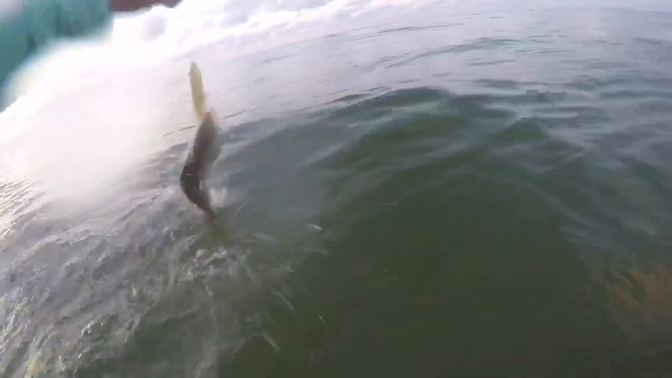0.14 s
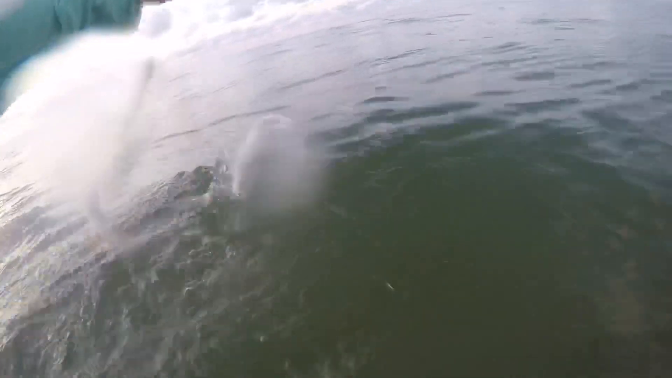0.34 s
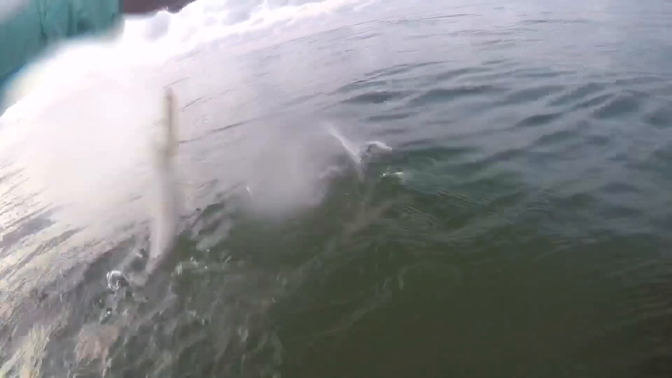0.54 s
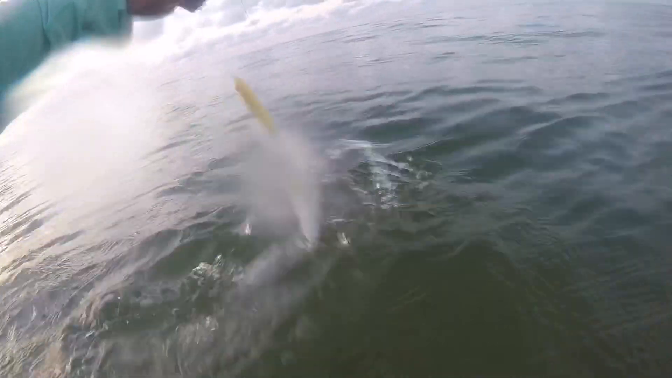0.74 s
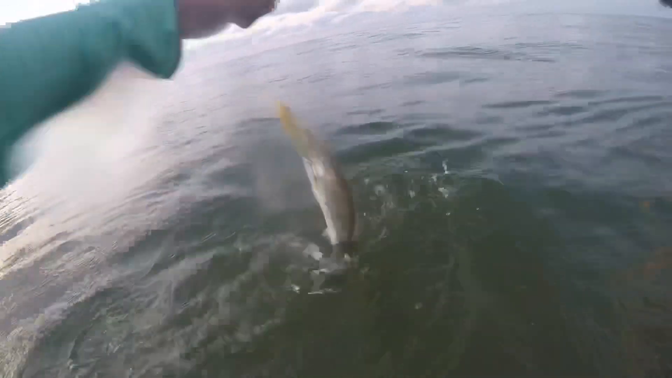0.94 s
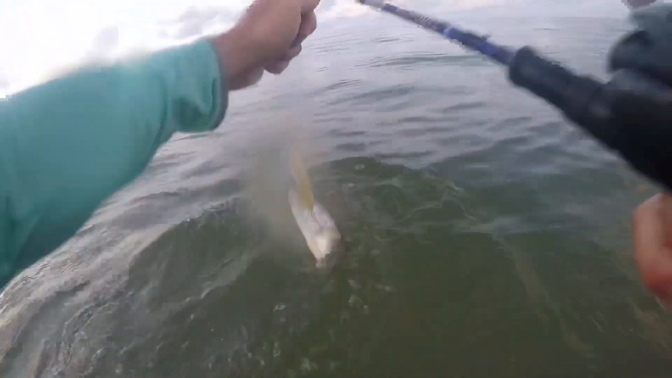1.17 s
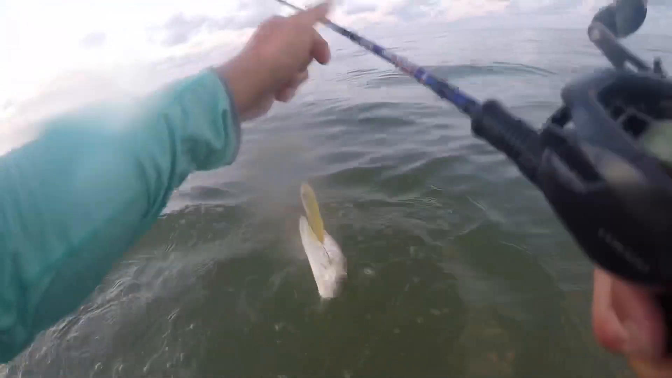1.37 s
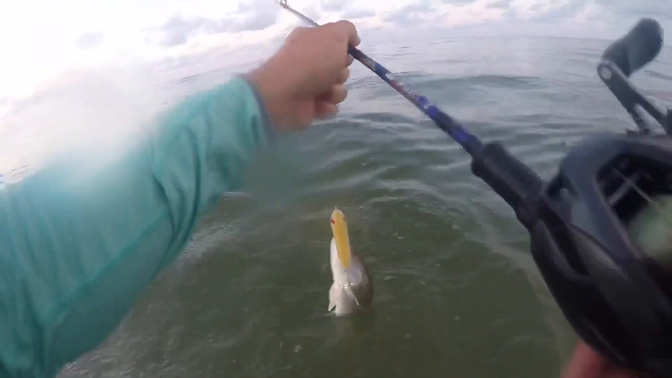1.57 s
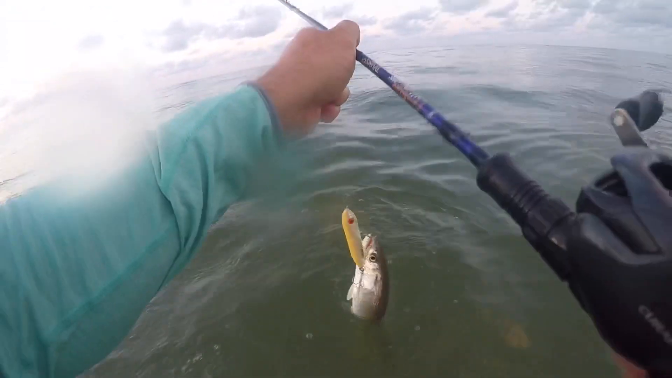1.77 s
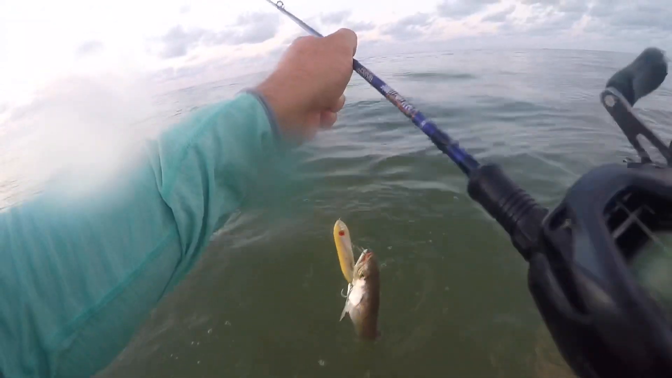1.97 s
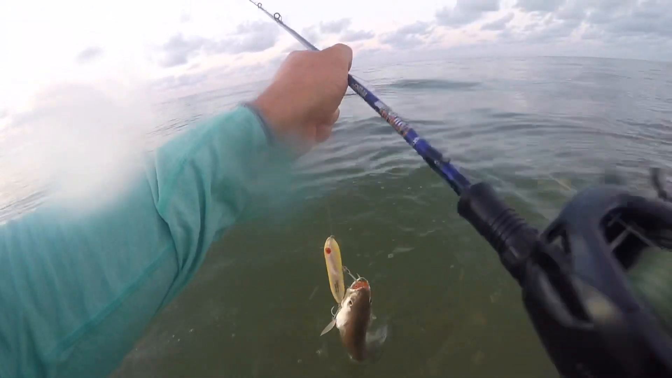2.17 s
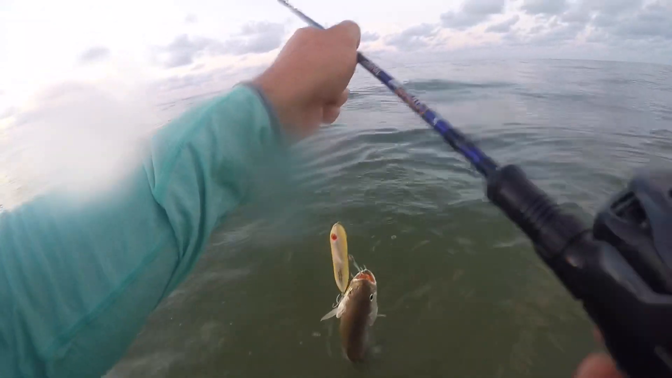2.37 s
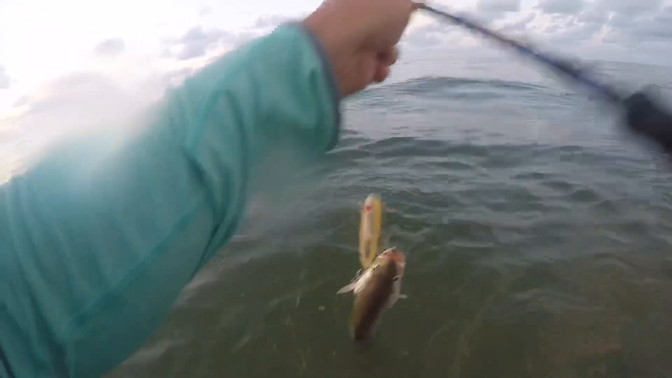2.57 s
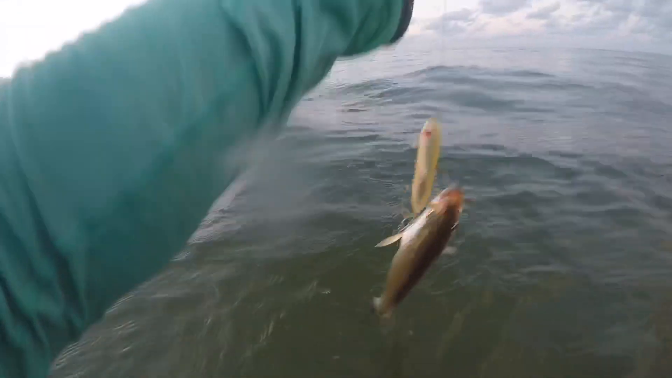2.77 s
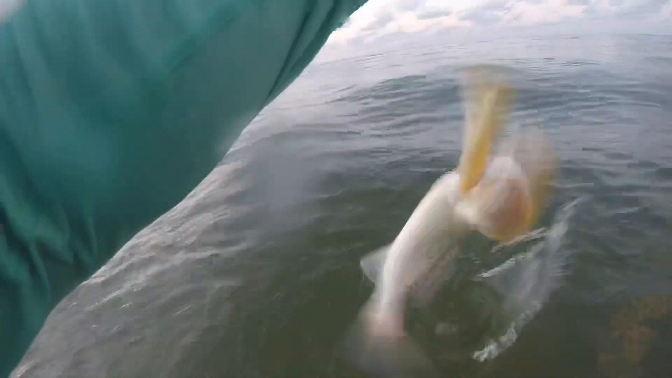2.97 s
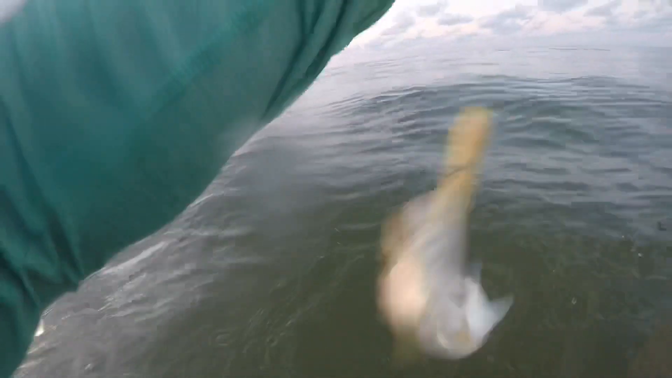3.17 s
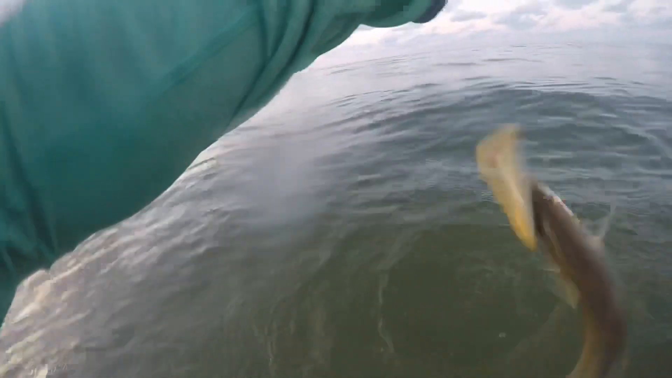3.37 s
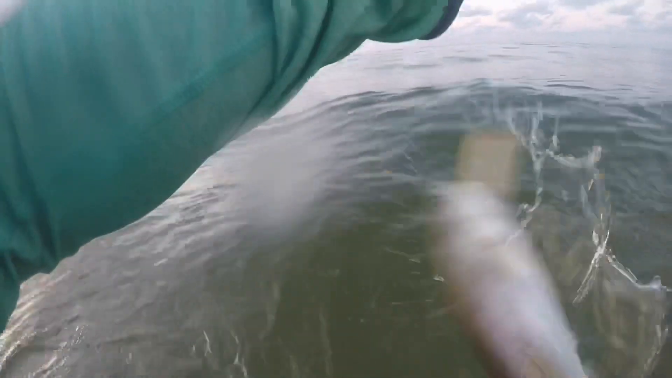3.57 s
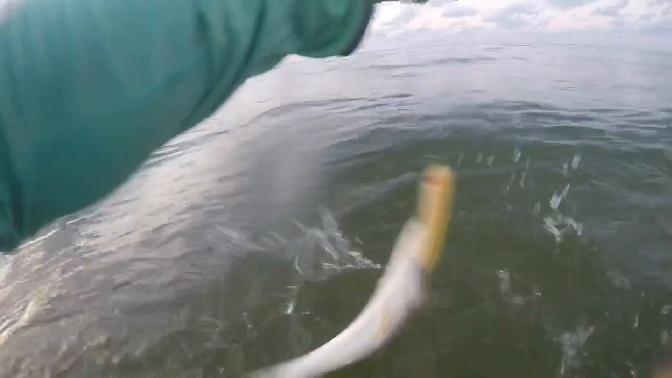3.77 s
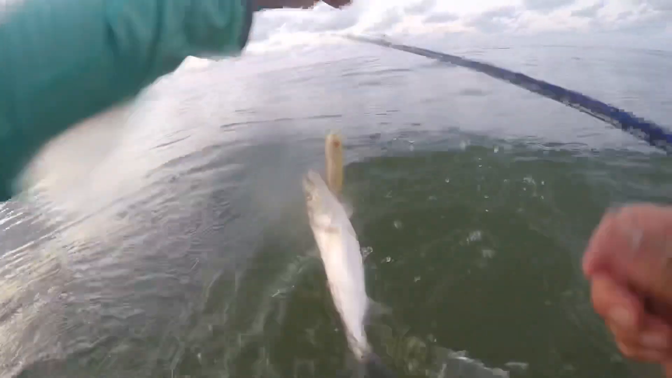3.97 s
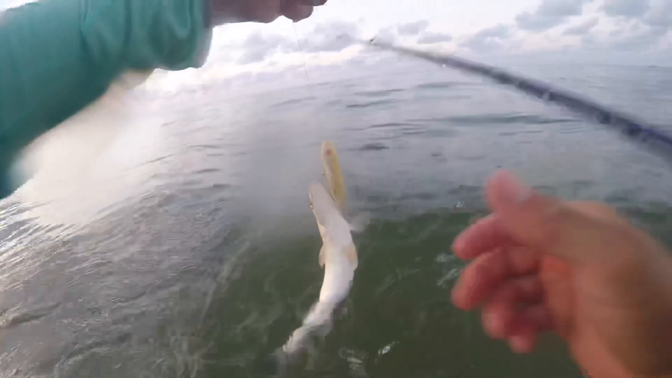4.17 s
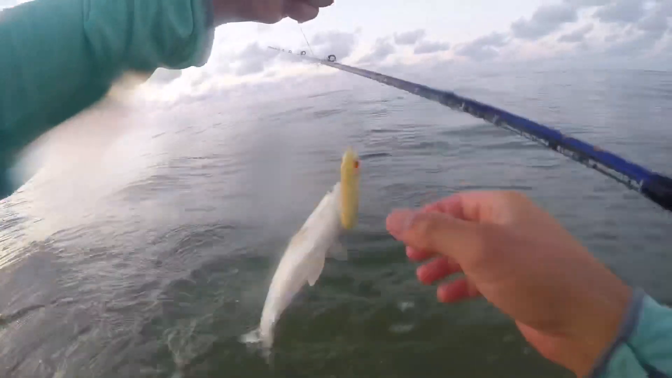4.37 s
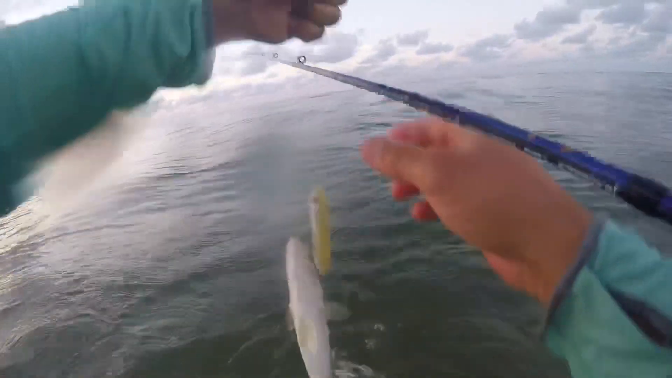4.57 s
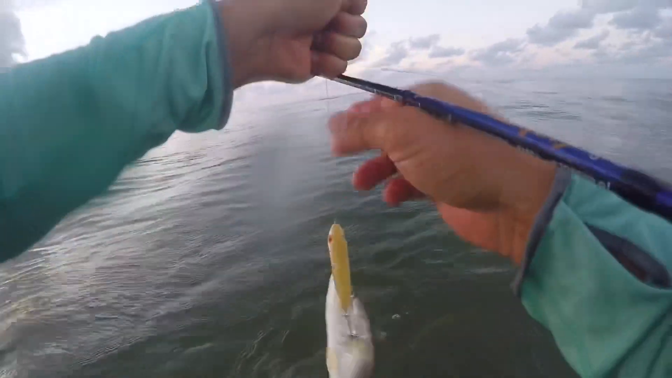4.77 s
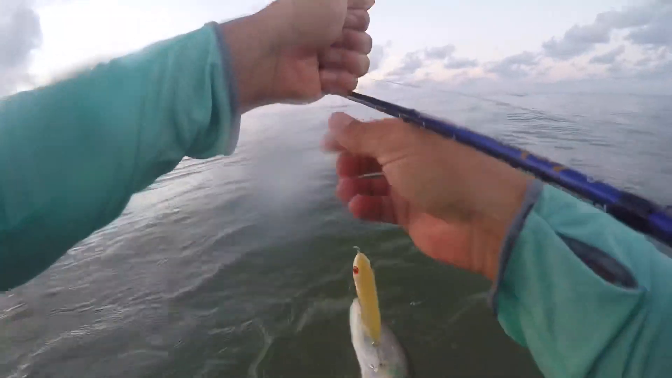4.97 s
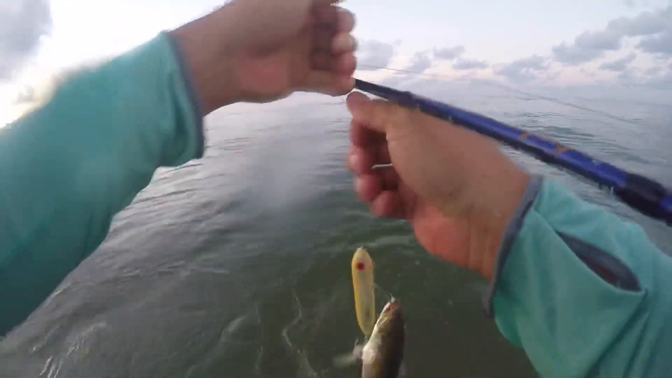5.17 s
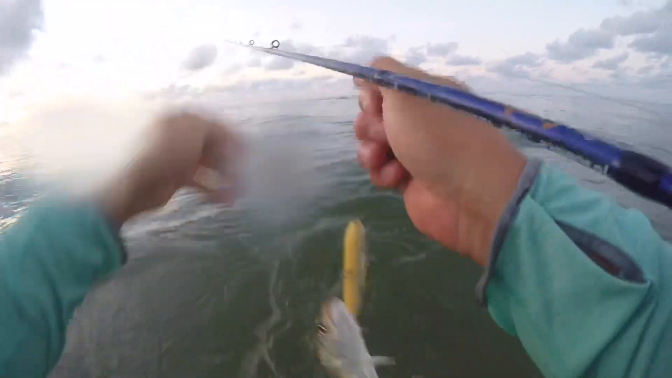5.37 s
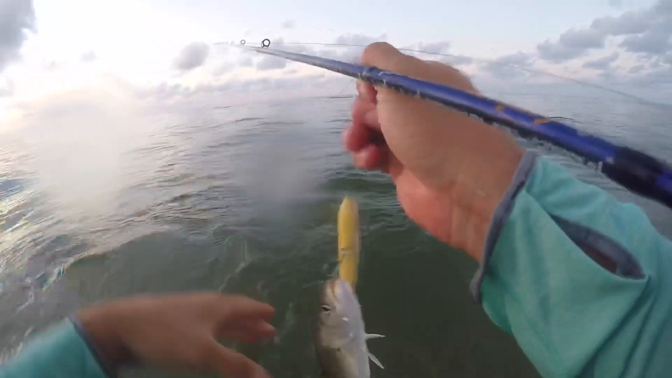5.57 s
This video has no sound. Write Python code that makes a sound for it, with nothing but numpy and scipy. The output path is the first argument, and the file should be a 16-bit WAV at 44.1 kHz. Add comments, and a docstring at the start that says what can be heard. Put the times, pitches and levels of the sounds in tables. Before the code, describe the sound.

A hooked fish thrashes at the sea surface, rattling a hollow hard lure with sharp clicks, splashes and drips over low wind and surf.

```python
"""Low surf, gusty wind and faint hiss, made of filtered noise, lie under a hooked fish at the sea surface.
In the first second it thrashes: its shakes rattle a hollow lure (impacts and shell modes) and throw spray
(trains of ticks and bubbles), with slaps, plops and drips; bumps and sleeve rubs reach a body-worn camera.
Just after 2 s the tackle clacks; near 3 s the strongest thrashing begins, then water trickles near 4 s
with a thin squeak of a few harmonics, and weaker bouts follow up to the end."""
import sys
import numpy as np
from scipy import signal
from scipy.fft import rfft, irfft
from scipy.io import wavfile

SR = 44100
rng = np.random.default_rng(int(sys.argv[2]) if len(sys.argv) > 2 else 0)


def pcm_store(signal):
    """Save signal as 16-bit PCM."""
    levels = np.round(np.clip(np.atleast_2d(signal), -1, 1) * 32767)
    wavfile.write(sys.argv[1], SR, levels.astype(np.int16).T)


N = 248283
FREQUENCIES = np.fft.rfftfreq(N, 1 / SR)
TIME = np.arange(N) / SR
SHORT = TIME[:8192]  # time axis of one brief event

# Every "colour" table is a spectrum. Each row: frequency in Hz, relative level in dB.
# Wind on the microphone. Each row: time in seconds, level in dB.
WIND_LEVEL = [(0, -42.5), (1.65, -42), (2.1, -40.5), (3.3, -34), (4.6, -40), (4.77, -31), (4.92, -40.5),
              (5.63, -40)]
# Colour of the wind rumble. Each row: frequency in Hz, relative level in dB.
WIND_COLOUR = [(8.8, -11), (15, 3.5), (33, 1.5), (97, -14.5), (140, -19), (180, -27.5), (310, -120)]
# Surrounding surf. Each row: time in seconds, level in dB.
SURF_LEVEL = [(0, -51.5), (2.1, -57.5), (3.6, -53.5), (5.63, -52.5)]
# Colour of the surf. Each row: frequency in Hz, relative level in dB.
SURF_COLOUR = [(150, -17.5), (250, -1.5), (400, -4), (600, -2.5), (780, -7), (1080, 0), (1500, -14),
               (2100, -16.5), (3000, -32), (6000, -61)]
# Colour of the steady hiss. Each row: frequency in Hz, relative level in dB.
HISS_COLOUR = [(500, -5.5), (1500, 0.5), (2700, 1), (4700, -3.5), (8000, -10.5), (12000, -12),
               (15500, -13.5)]
HISS_DB = -62.5

# Arm movements that rub a sleeve near the camera. Each row: middle in seconds,
# half length in seconds (to 1/e of the peak), level in dB.
SLEEVE_RUBS = [(.33, 0.1, -50), (1.098, 0.31, -57.5), (3.186, 0.5, -50.5), (4.01, 0.084, -46),
               (4.302, 0.062, -46.5), (4.576, 0.16, -49), (5.42, 0.21, -47.5)]
RUB_REST_DB = -62  # the sleeves between movements
# Colour of the rubbing. Each row: frequency in Hz, relative level in dB.
RUB_COLOUR = [(50, -5), (90, 3), (130, -1), (185, 7), (300, -7), (500, -17), (1000, -27), (3000, -41.5)]
# Soft bumps on the camera. Each row: start in seconds, level in dB.
CAMERA_BUMPS = [(0.269, -26.5), (.306, -21.5), (1.098, -21), (1.14, -22), (1.305, -21.5), (1.644, -24.5),
                (1.681, -27), (3.343, -21.5), (4.643, -25), (4.718, -23), (5.198, -24.5), (5.438, -21.5)]
BUMP_START_HZ, BUMP_DECAY_S = 174.7, 0.0038  # every bump sounds the same dull note of the case

# The tackle snapping tight. Each row: start in seconds, relative level in dB, decay in seconds.
TACKLE_CONTACTS = [(2.112, -37.5, 0.0054), (2.1258, -24, 0.0035), (2.129, -14, 0.0016),
                   (2.1306, -8, 0.00087), (2.1336, -16.5, 0.0011)]
# Colour of the contacts. Each row: frequency in Hz, relative level in dB.
TACKLE_COLOUR = [(150, -6), (400, -34), (650, -15), (850, -25), (1300, -13), (1850, -20), (2250, -17),
                 (2660, -3), (3100, -14.5), (4000, -7), (5900, -12.5), (7400, -26), (10000, -18),
                 (13300, -21), (15500, -26)]
# Ring of the tackle. Each row: frequency in Hz, level in dB, time to fall by 60 dB in seconds.
TACKLE_MODES = [(1840, -25, .028), (1875, -41, .09), (2660, -17, .018), (3860, -44, .055), (5930, -32, .02)]

# The body of the fish slapping the water. Each row: start in seconds, relative level in dB,
# centre frequency in Hz, decay in seconds.
BODY_SLAPS = [(.922, -40, 2000, 0.0045), (.998, -34.5, 1900, 0.0024), (3.497, -29, 1860, 0.02),
              (3.564, -23, 1760, 0.0084), (3.61, -33.5, 1110, .0036)]
# The largest air pockets closing. Each row: start in seconds, level in dB, starting pitch in Hz,
# decay in seconds, glide in octaves per second.
CAVITY_PLOPS = [(.005, -35, 833, 0.013, 16.5), (.292, -38, 1425, .0069, 1), (.292, -34, 587, .0069, -24),
                (.435, -27, 1184, 0.0029, -5), (.436, -22, 400, 0.0026, -4),
                (0.493, -28.5, 437, 0.025, 3.5), (.534, -35.5, 873, 0.012, 19.5),
                (.594, -39.5, 463, 0.025, 51.5), (.727, -40.5, 1460, .0086, -3),
                (.977, -31.5, 1095, 0.0054, 7), (1.001, -24, 1210, 0.0029, -10),
                (1.048, -39.5, 928, .015, -9), (3.567, -21.5, 1320, .0057, -0.5),
                (3.568, -27, 336, .0037, -13), (3.612, -33, 390, 0.0041, -3), (3.797, -31, 1800, 0.0027, 5),
                (3.932, -33, 1350, 0.0025, 6), (4.121, -40, 1870, 0.0073, 6),
                (5.618, -33.5, 1117, 0.016, -12)]
# The loudest drops that plink into the sea. Each row: start in seconds, level in dB, starting pitch in Hz.
FALLING_DROPS = [(0.5819, -23.5, 3720), (0.892, -34.5, 4700), (.912, -39, 2040), (.66, -28.5, 2950),
                 (.868, -40, 3150), (3.309, -18.5, 4520), (3.924, -35, 3900), (4.052, -36, 3740),
                 (4.216, -37.5, 3100)]
DROP_CYCLES = 11.7  # a drop's decay, in cycles of its starting pitch

# Bouts of thrashing. Each row: start in seconds, length in seconds, then relative levels in dB
# of the spray, the churned water and the light knocks.
BOUTS = [(0, 0.23, -53, -56, -32.5), (0.31, 0.34, -48.5, -47.5, -41), (0.763, 0.18, -49.5, -53, -31.5),
         (2.982, 0.3, -45, -53.5, -26), (3.32, 0.25, -47, -52, -26), (3.675, 0.21, -49.5, -60, -28.5),
         (3.925, 0.275, -53.5, -52.5, -41), (4.285, .05, -59, -50.5, -50), (4.55, 0.25, -59.5, -66, -35),
         (5.252, 0.24, -66, -52, -52)]
BOUT_RISE_S, BOUT_FALL_DB_PER_S = 0.034, 83
# Colour of the spray's ticks. Each row: frequency in Hz, relative level in dB.
SPRAY_COLOUR = [(530, -31), (900, 1), (1820, -8), (3030, -3), (5000, -17), (5700, -13.5), (6270, -11.5),
                (11000, -31.5), (13000, -20), (15500, -43)]
# Shakes of the fish, each flicking off a sheet of drops. Each row: start in seconds,
# relative level in dB, length in seconds.
SHAKES = [(.029, -34, .018), (0.059, -46, 0.026), (0.17, -41.5, 0.033), (.204, -36, 0.017),
          (0.343, -35.5, 0.026), (.398, -42.5, 0.012), (0.634, -45, 0.031), (2.97, -43.5, 0.039),
          (3.011, -33, 0.039), (3.09, -36, 0.033), (3.132, -32.5, 0.016), (3.168, -20, 0.0084),
          (3.192, -37.5, 0.04), (3.238, -30, 0.0065), (3.308, -31, 0.011), (3.353, -32.5, 0.046),
          (3.421, -30.5, 0.013), (3.441, -38.5, 0.093), (3.51, -33, 0.037), (3.749, -45, .04),
          (3.821, -51.5, 0.094), (4.552, -45.5, 0.02), (4.573, -39.5, 0.021), (4.595, -48, .038),
          (4.72, -55.5, 0.078)]
# Colour of the flicked drops. Each row: frequency in Hz, relative level in dB.
FLICK_COLOUR = [(500, -21), (1100, -12.5), (2000, -3.5), (3000, 4.5), (4200, -3.5), (5800, -1.5),
                (6600, -8), (7800, -4.5), (9000, -14), (13000, -15.5), (15500, -22)]

# Hard hits of the shaken lure and hooks. Each row: start in seconds, relative level in dB,
# relative treble in dB.
HARD_HITS = [(0.0372, -20.5, -6), (.0545, -17, -34), (0.067, -22, -19), (.172, -21.5, -11), (.185, -18, -7),
             (.2037, -13.5, -11.5), (0.2268, -24, -13), (.2354, -27, -3.5), (0.255, -18.5, -27),
             (0.3418, -16, -24), (0.346, -16.5, -6), (.492, -15, -23.5), (.5806, -12.5, -27),
             (0.619, -12.5, -26), (.6508, -17, -26), (0.7616, -13.5, -20.5), (0.8059, -22.5, -16),
             (0.9183, -17, -35), (1.067, -19.5, -55), (2.9257, -13.5, -42), (2.9326, -11, -33),
             (2.9447, -17, -28), (2.988, -21, -15), (3.0155, -2.5, -39), (3.0233, -16, -7),
             (3.0308, -11.5, -5), (3.041, -11, -11), (3.0816, -11.5, -20), (3.0968, -5, -16),
             (3.1084, -9, -32), (3.1485, -4, -23), (3.1682, -7, -11), (3.184, -13, -13), (3.212, -14, -23),
             (3.2356, 0, -21.5), (3.263, -17.5, -13), (3.3039, -17, -14), (3.311, -21, -13),
             (3.3248, -17, -3), (3.34, -13, -8.5), (3.3463, -13, -5), (3.3598, -11, -17),
             (3.3917, -14.5, -11), (3.4267, -9, -23), (3.4352, -12.5, -16.5), (3.471, -20, -10),
             (3.5042, -6, -17), (3.5198, -4.5, -23), (3.689, -25, -31), (3.7188, -16, -25),
             (3.7315, -14, -34), (3.7968, -20, -23), (3.8754, -4, -25.5), (4.0975, -29, -11),
             (4.4799, -27, -19), (4.5744, -11.5, -21), (4.5919, -16.5, -31), (4.622, -15, -37),
             (4.698, -16.5, -24), (4.7365, -20, -36), (4.754, -19, -34), (4.787, -27.5, -23),
             (5.3397, -26, -26.5), (5.4587, -22, -53), (5.5867, -25, -21), (5.6148, -26, -22)]
KNOCKS_PER_S = 45  # slots for light knocks of the lure while the fish moves
# Colour of the hits. Each row: frequency in Hz, relative level in dB.
LURE_COLOUR = [(350, -13.5), (600, -15), (1100, -3.5), (2000, -8), (3000, 6), (4000, 2.5), (5000, -10.5),
               (5800, -15.5), (6600, -6.5), (7700, -9), (8800, -17), (10300, -14.5), (11500, -22.5),
               (13000, -12.5), (15500, -20.5)]
# Modes of the lure and its hooks. Each row: frequency in Hz, relative level in dB,
# time to fall by 60 dB in seconds.
LURE_MODES = [(2685, -45.5, 0.017), (2947, -35.5, 0.075), (3378, -47.5, 0.096), (4720, -45, 0.017),
              (5730, -27, 0.014), (5900, -32, 0.015), (7703, -64, 0.052), (10700, -52, 0.033)]
RING_HZ, RING_SPREAD = 2996, 0.05  # the shell's main ring, and its share of change from hit to hit

BAND_EDGE_HZ = 15550


def amp(db):
    """Logarithmic level: decibels to gain."""
    return 10 ** (np.asarray(db) / 20)


def unit(x):
    """Power normalisation: scales to rms 1."""
    return x / np.sqrt(np.mean(x ** 2) + 1e-20)


def add(mix, s, sound):
    """Superposition: mixes a sound in at time s."""
    part = mix[max(0, round(s * SR)):][:len(sound)]
    part += sound[:len(part)]


def level(rows):
    """Envelope: gain through (seconds, dB) rows, fading to silence within 30 ms outside them."""
    s, db = np.transpose(rows)
    fade = np.interp(TIME, [s[0] - .03, s[0], s[-1], s[-1] + .03], [0, 1, 1, 0])
    return amp(np.interp(TIME, s, db)) * fade


def swell(middle, half_length):
    """Gaussian envelope: a smooth rise and fall around a moment."""
    return np.exp(-((TIME - middle) / half_length) ** 2)


def colour(x, points):
    """Minimum-phase filtering: a causal filter of the given shape; white noise keeps its power."""
    hz, db = np.transpose(points)
    gain = unit(amp(np.interp(np.log(FREQUENCIES + 1), np.log(hz + 1), db)))
    mirrored = np.r_[gain, gain[(N - 1) // 2:0:-1]]
    log_gain = np.log(np.maximum(mirrored, 1e-5))
    # the Hilbert transform of the log gain gives the phase
    response = np.exp(np.conj(signal.hilbert(log_gain)))[:len(FREQUENCIES)]
    return irfft(rfft(x) * response, N)


def drift(hz):
    """Low-passed noise: a slow random wander of rms 1, up to about hz."""
    spectrum = rfft(rng.standard_normal(N)) * np.exp(-(FREQUENCIES / hz) ** 2)
    return unit(irfft(spectrum, N))


def ring(modes):
    """Modal vibration: dying sines of a struck object."""
    return sum(amp(db - 60 * SHORT / t60) * np.sin(2 * np.pi * hz * SHORT) for hz, db, t60 in modes)


def bubble(hz, decay, glide, rise=0.00011):
    """Damped resonance: a dying oscillation whose pitch glides in octaves per second."""
    pitch = hz * 2 ** np.clip(glide * SHORT, -1.5, 1.5)
    oscillation = np.sin(2 * np.pi * np.cumsum(pitch) / SR)
    return oscillation * np.exp(-SHORT / decay) * (1 - np.exp(-SHORT / rise))


def burst(decay):
    """Broadband impact: a puff of dying noise."""
    return rng.standard_normal(len(SHORT)) * np.exp(-SHORT / max(decay, 1e-4))


def contact(decay):
    """Local contact resonance: a sharp tick of random pitches that ring for a moment; energy 1."""
    t = SHORT[:1024]
    place, phase, size = rng.random((3, 22, 1))
    hz = 1200 + 15000 * place
    partials = size ** 2 * np.cos(2 * np.pi * (hz * t + phase)) * np.exp(-t / decay)
    tick = partials.sum(0)
    return tick / np.linalg.norm(tick)


def shower(per_s, spread_db):
    """Random arrivals: independent impacts of either sign, a few of them large."""
    size = amp(spread_db * np.minimum(rng.exponential(1, N), 4))
    return size * rng.choice([-1, 1], N) * (rng.random(N) < per_s / SR)


def crackle(per_s, spread_db, decay, count=24):
    """Superposed random arrivals: a train of unlike ticks."""
    trains = (signal.oaconvolve(shower(per_s / count, spread_db), contact(decay))[:N] for _ in range(count))
    return sum(trains)


def fizzing(pitches, per_s, cycles, glide):
    """Bubble resonance over many sizes: each pitch sounds per_s times a second and dies in cycles."""
    bubbles = (signal.oaconvolve(shower(per_s, 4.2), bubble(hz, cycles / hz, glide))[:N] for hz in pitches)
    return unit(sum(bubbles))


def thrashing():
    """Shared envelopes of spray, churn and knocks: each bout rises quickly, holds, and decays exponentially."""
    gains = np.zeros((3, N))
    for start, length, *dbs in BOUTS:
        rise = np.clip((TIME - start) / BOUT_RISE_S + 1, 0, 1)  # full at the start time
        fall = amp(-BOUT_FALL_DB_PER_S * np.maximum(TIME - start - length, 0))
        gains = np.maximum(gains, amp(dbs)[:, None] * rise * fall)
    return gains


def sea(gust_db=3.0, lap_db=0.92):
    """Modulated noise: gusty wind rumble and the wash of the surf, over a faint steady hiss."""
    gusts = rng.standard_normal(N) * amp(gust_db * drift(5.6))
    laps = rng.standard_normal(N) * amp(lap_db * drift(11.6))
    wind = level(WIND_LEVEL) * unit(colour(gusts, WIND_COLOUR))
    surf = level(SURF_LEVEL) * unit(colour(laps, SURF_COLOUR))
    hiss = amp(HISS_DB) * unit(colour(rng.standard_normal(N), HISS_COLOUR))
    return wind + surf + hiss


def handling(lump_db=3):
    """Structure-borne sound: lumpy sleeve rubbing and bumps reach the microphone through its case."""
    rubbing = amp(RUB_REST_DB) + sum(amp(db) * swell(s, half_length) for s, half_length, db in SLEEVE_RUBS)
    lumpy_noise = rng.standard_normal(N) * amp(lump_db * drift(11.5))
    out = rubbing * unit(colour(lumpy_noise, RUB_COLOUR))
    for s, db in CAMERA_BUMPS:
        add(out, s, amp(db) * bubble(BUMP_START_HZ, BUMP_DECAY_S, -34.0, rise=0.0012))
    return out


def squeak(s=4.16, length=0.08, hz=692, db=-50, fall_db=5):
    """Harmonic series without its lowest members: a faint thin squeak, unsteady and slightly rising."""
    t = np.arange(0, length, 1 / SR)
    pitch = hz * (1 + 0.21 * (t - length / 2) + 0.007 * drift(250)[:len(t)])
    turns = np.cumsum(pitch) / SR
    tone = sum(amp(-fall_db * (k - 3.5)) * np.sin(2 * np.pi * k * turns) for k in range(3, 9))
    out = np.zeros(N)
    add(out, s, amp(db) * tone * signal.windows.tukey(len(t), .6))
    return out


def tackle(ring_s=2.1305, thud_s=2.139, thud_db=-24, thud_hz=95, thud_decay=0.016):
    """Impact excitation: tight hard contacts, then a brief modal ring and a low thud through the rod."""
    contacts = np.zeros(N)
    for s, db, decay in TACKLE_CONTACTS:
        add(contacts, s, amp(db) * burst(decay))
    out = colour(contacts, TACKLE_COLOUR)
    add(out, ring_s, ring(TACKLE_MODES))
    add(out, thud_s, amp(thud_db) * bubble(thud_hz, thud_decay, -29.0, rise=0.00079))
    return out


def trickle(s=4.02, half_length=0.18, db=-53):
    """Bubble resonance: water runs off the lifted fish and rings small, clear bubbles."""
    return amp(db) * swell(s, half_length) * fizzing(np.geomspace(1600, 4300, 18), per_s=13, cycles=12, glide=3.5)


def splashes():
    """Surface impact and cavity resonance: flat slaps, plops of closing cavities, drops falling back."""
    out = np.zeros(N)
    for s, db, hz, decay in BODY_SLAPS:
        band = signal.butter(2, [hz * 0.6, hz * 1.6], "band", fs=SR)
        slap = signal.lfilter(*band, burst(decay) * (1 - np.exp(-SHORT / 0.0038)))
        add(out, s, amp(db + 6.5) * slap / abs(slap).max())
    for s, db, hz, decay, glide in CAVITY_PLOPS:
        add(out, s, amp(db) * bubble(hz, decay, glide))
    for s, db, hz in FALLING_DROPS:
        add(out, s, amp(db) * bubble(hz, DROP_CYCLES / hz, glide=5.3))
    return out


def spray(ticks_db=-5.0, drips_db=-5, slosh_db=-5):
    """Drop impact and entrained air: drops tick and trap small bubbles; churned water traps larger ones."""
    flying, churn, _ = thrashing()
    ticks = unit(colour(crackle(520, 3.5, .0009), SPRAY_COLOUR))
    # bubbles rise in pitch as they near the surface
    drips = fizzing(np.geomspace(2300, 6000, 18), per_s=18, cycles=9.2, glide=4.0)
    slosh = fizzing(np.geomspace(330, 2400, 18), per_s=25, cycles=5.3, glide=6.5)
    return flying * (amp(ticks_db) * ticks + amp(drips_db) * drips) + churn * amp(slosh_db) * slosh


def flicks(drops_db=-1, bubbles_db=-5):
    """Many small impacts: a flick lands as coarse crackle and tiny bubbles, fading as the sheet thins."""
    flow = np.zeros(N)
    for s, db, length in SHAKES:
        progress = np.linspace(0, 1, max(round(length * SR), 8))
        thinning = 1.2 - .5 * progress
        add(flow, s, amp(db) * signal.windows.tukey(len(progress), .35) * thinning)
    drops = unit(colour(crackle(750, 2.2, .001), FLICK_COLOUR))
    bubbles = fizzing(np.geomspace(2700, 8200, 18), per_s=70, cycles=4.0, glide=0)
    return flow * (amp(drops_db) * drops + amp(bubbles_db) * bubbles)


def light_knocks(spread_db=3.5, treble_db=-23):
    """Random excitation: small hits whose level follows the thrashing; rows as in HARD_HITS."""
    slots = np.arange(0, TIME[-1], 1 / KNOCKS_PER_S)
    chance = rng.random((1024, 3))[:len(slots)]
    times = slots + chance[:, 0] / KNOCKS_PER_S
    liveliness = np.interp(times, TIME, thrashing()[2])
    extra_db = spread_db * np.minimum(-np.log(1 - chance[:, 1]), 2)
    dbs = 20 * np.log10(liveliness + 1e-9) + extra_db
    trebles = treble_db + 10 * (chance[:, 2] - .5)
    return [row for row in zip(times, dbs, trebles) if row[1] > -55]  # drop the faintest


def lure(hit_db=0.0, snap=0.41, scatter=0.0039, rebound=0.84, ring_db=-16, ring_decay=0.0024, bright_db=19):
    """Impact and shell resonance: a snap, a short ring and fast rebounds excite the hollow shell's modes."""
    hits, rings = np.zeros(N), np.zeros(N)
    low, high = (signal.butter(2, 5500, kind, fs=SR) for kind in ("low", "high"))
    for s, db, treble_db in HARD_HITS + light_knocks():
        hz = RING_HZ * np.exp(RING_SPREAD * rng.standard_normal())
        # the rebounds build up over a millisecond before they die away
        build_up = 1 - np.exp(-SHORT / .0006)
        rebounds = (burst(scatter) * rng.exponential(1, len(SHORT)) * build_up)[:1024]
        tick = contact(.0011) * np.minimum(SHORT[:1024] / .0003, 1)
        blow = tick + rebound * rebounds / np.linalg.norm(rebounds)
        blow[20] += snap  # a one-sample click
        # glancing hits have little treble; the minus sign aligns the two bands at the crossover
        treble = amp(treble_db + bright_db) * signal.lfilter(*high, blow)
        blow = signal.lfilter(*low, blow) - treble
        add(hits, s + 0.00021, amp(db + hit_db) * blow)
        add(rings, s + 0.00078, amp(db + hit_db + ring_db) * bubble(hz, ring_decay, 0))
    shell = signal.oaconvolve(hits, ring(LURE_MODES))[:N]
    return colour(hits, LURE_COLOUR) + rings + shell


def scene():
    """Free field: open water gives no echo, so all sources arrive dry and simply add."""
    background = sea() + handling() + squeak() + tackle()
    water = trickle() + splashes() + spray() + flicks()
    return (background + water + lure())[None]


def record(dry):
    """Band limitation: the camera passes only what lies below its upper edge."""
    lowpass = signal.firwin(301, BAND_EDGE_HZ, window=("kaiser", 9), fs=SR)
    return signal.oaconvolve(dry, lowpass[None], "same")


dry = scene()
out = record(dry)
pcm_store(out)
```